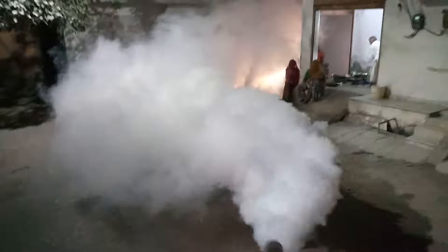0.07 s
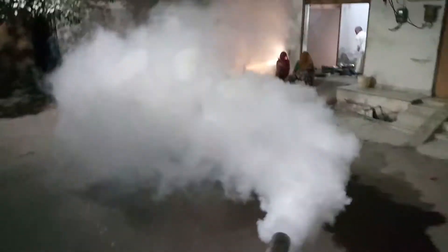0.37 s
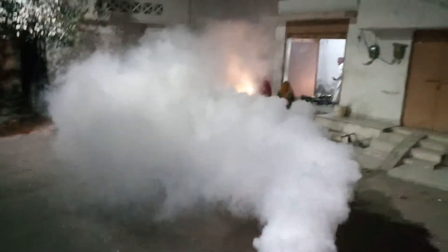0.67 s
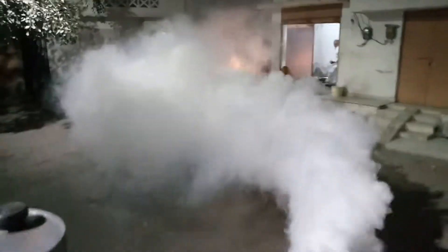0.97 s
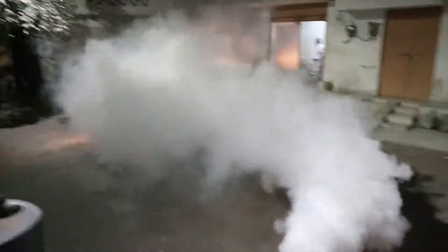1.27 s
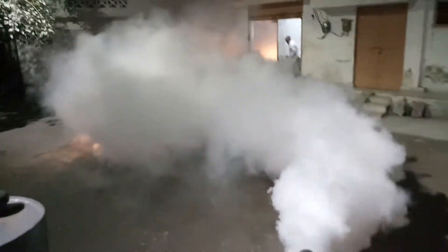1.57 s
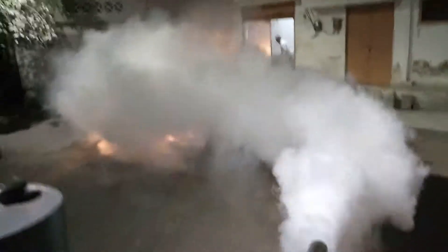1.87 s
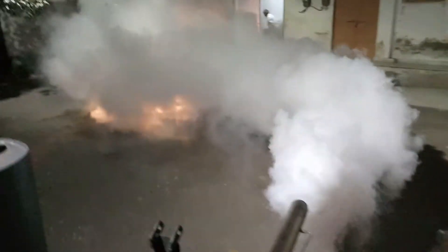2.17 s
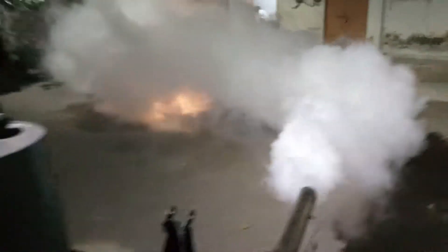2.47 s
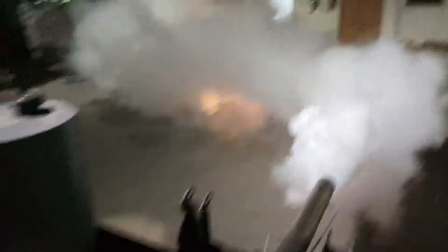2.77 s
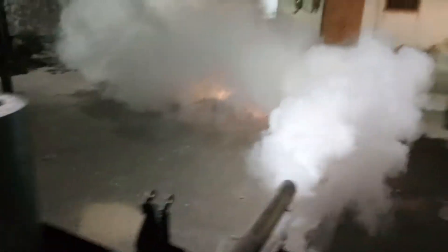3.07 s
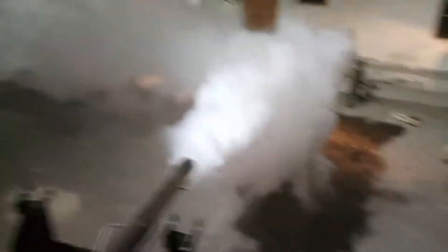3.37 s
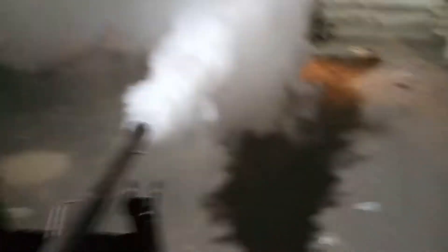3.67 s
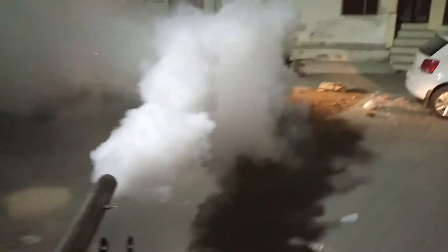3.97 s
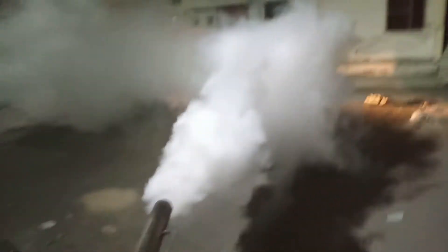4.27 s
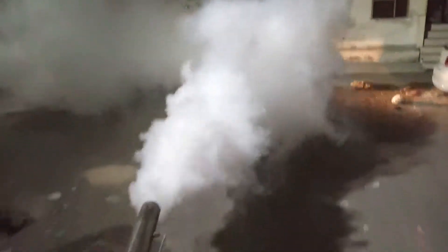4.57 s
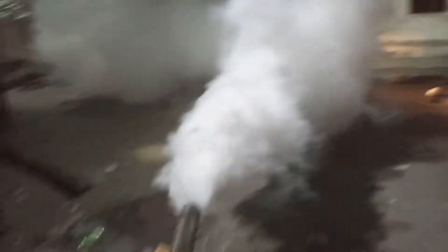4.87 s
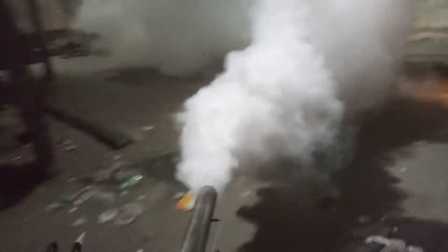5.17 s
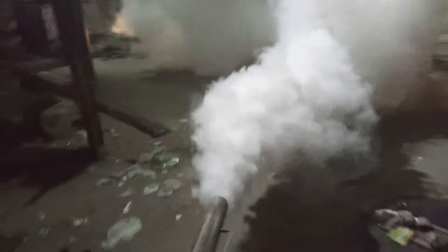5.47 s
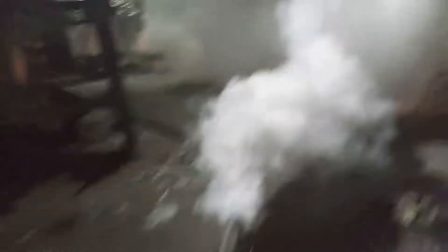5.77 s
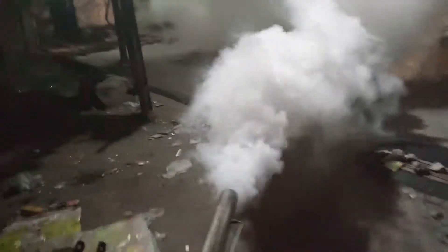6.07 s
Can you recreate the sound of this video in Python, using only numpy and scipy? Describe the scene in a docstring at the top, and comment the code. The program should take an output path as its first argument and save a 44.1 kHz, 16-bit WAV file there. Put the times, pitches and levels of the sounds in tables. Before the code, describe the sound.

At about 0.1 seconds a fogging machine cuts in abruptly, already running, loud and close, heard from just behind its barrel. Its pulse-jet engine fires very rapidly, making a low, steady drone with a harsh, buzzing rasp and a hiss of spray on top. The jet roars softly underneath, and the house fronts of the narrow street return a faint, dull wash. The pitch barely wavers and the level stays even. From about 1 second, as the barrel swings, the rasp turns a little less sizzling and more barking. Around 3.5 to 4 seconds it brightens again and gains some bite. At about 5.4 seconds the beat stumbles once, very briefly, with a small dull bump. The engine then carries on as before until the end, a little after 6 seconds.

```python
"""A narrow street, just behind the barrel of a hand-carried pulse-jet fogging machine blowing smoke.
The tube fires about 89 times a second: its air column drones, and every firing sends a sharp shock
out of the nozzle that scatters off the machine and the ground. This rasp changes colour as the barrel
swings. The jet roars underneath, house fronts return a faint wash, and the beat stumbles once."""
import sys
import numpy as np
from scipy import signal
from scipy.fft import rfft, irfft
from scipy.io import wavfile
from scipy.ndimage import uniform_filter1d, map_coordinates

SR = 44100
rng = np.random.default_rng(int(sys.argv[2]) if len(sys.argv) > 2 else 0)


def store_pcm(level_fs):
    """Save levels as 16-bit WAV."""
    pcm = np.round(np.clip(level_fs, -1, 1) * 32767).astype(np.int16)
    wavfile.write(sys.argv[1], SR, np.atleast_2d(pcm).T)


N = 274302
TIME = np.arange(N) / SR
START_S, STUMBLE_S = .1058, 5.423   # the sound cuts in; the beat stumbles


def from_db(db):
    """Decibels to gain."""
    return 10 ** (np.asarray(db) / 20)


def unit_rms(x):
    """Scale to unit power."""
    return x / np.sqrt(np.mean(x ** 2) + 1e-20)


def steady(x, size=3500):
    """Ride the gain to hold unit power, smoothed over about a dozen firings."""
    power = uniform_filter1d(uniform_filter1d(x ** 2, size), size)
    return x / np.sqrt(np.maximum(power, 1e-12))


def curves(rows):
    """Draw each column of a timed table as a curve over every sample."""
    seconds, *columns = np.transpose(rows)
    return [np.interp(TIME, seconds, column) for column in columns]


def drift(rate_hz, hop=40, settle=2000):
    """A smooth random wander with spread 1, mostly slower than rate_hz."""
    pole = np.exp(-2 * np.pi * rate_hz * hop / SR)
    noise = rng.standard_normal(N // hop + settle + 2)
    slow = signal.lfilter([1], [1, -2 * pole, pole ** 2], noise)[settle:]
    return np.interp(np.arange(N) / hop, np.arange(len(slow)), unit_rms(slow))


def butter(x, hz, kind, order=2):
    """Butterworth filter."""
    return signal.sosfilt(signal.butter(order, hz, kind, fs=SR, output="sos"), x)


def equalise(x, points, size=4096):
    """Minimum-phase EQ through (Hz, dB) points: nothing rings ahead of an attack."""
    hz, db = np.transpose(points)
    grid_hz = np.maximum(np.fft.rfftfreq(size, 1 / SR), 1)
    gain = from_db(np.interp(np.log(grid_hz), np.log(hz), db))
    cepstrum = irfft(np.log(gain))
    cepstrum[1:size // 2] *= 2
    cepstrum[size // 2 + 1:] = 0
    return signal.fftconvolve(x, irfft(np.exp(rfft(cepstrum))))[:N]


def resonance(x, hz, width_hz):
    """A two-pole resonance of gain 1."""
    r = np.exp(-np.pi * width_hz / SR)
    poles = [1, -2 * r * np.cos(2 * np.pi * hz / SR), r * r]
    return signal.lfilter([1, 0, -1], poles, x) * (1 - r * r) / 2


def street_wash(x, t60_s):
    """House fronts return a dull wash, starting 20 ms late."""
    t = np.arange(SR // 2) / SR
    tail = rng.standard_normal(len(t)) * from_db(-60 * t / t60_s) * (t > .02)
    tail /= np.sqrt(np.sum(tail ** 2))
    return butter(signal.fftconvolve(x, tail)[:N], 3500, "low")


# The tube's murmur. Each row: pitch in Hz, width in Hz, level in dB.
MURMUR_MODES = [(164.3, 28, -33.5), (345, 18.4, -33.5), (528.2, 24, -34), (684, 38, -37.5),
                (1047, 13.5, -46)]
# The tone of the jet's rumble. Each row: frequency in Hz, relative level in dB.
RUMBLE_EQ = [(25, -17), (55, -14), (100, 6.5), (170, -13.5), (260, 4.5), (400, 1.5), (600, 0.5),
             (900, -3.5), (1600, -10), (4000, -22)]


def jet_roar(rumble_db):
    """The jet's turbulence makes a broad rumble and stirs the tube's own modes."""
    noise = rng.standard_normal(N)
    murmur = sum(from_db(db) * unit_rms(butter(noise, [hz - width / 2, hz + width / 2], "band"))
                 for hz, width, db in MURMUR_MODES)
    rumble = unit_rms(equalise(rng.standard_normal(N), RUMBLE_EQ))
    return murmur + from_db(rumble_db) * rumble


def stumble_bump(peak_db):
    """The stumble comes with one dull push of pressure."""
    return from_db(peak_db) * np.exp(-((TIME - STUMBLE_S) / .0017) ** 2)


# The barrel swings out, then partway back. Each row: time in seconds, swing from 0 to 1.
BARREL_SWING = [(0.1, 0.05), (0.85, 0.04), (1.1, 0.16), (1.55, 0.42), (2.25, .38), (2.45, 0.51),
                (3.2, 0.57), (3.55, 0.89), (4.05, 1), (4.5, 0.91), (5.0, .75), (6.2, 0.82)]


def facing(angle, reach):
    """1 when the barrel's swing is at the given angle, falling to 0 as it turns away."""
    swing, = curves(BARREL_SWING)
    return np.exp(-((swing - angle) / reach) ** 2)


# The engine's beat. Each row: time in seconds, firing rate in Hz.
FIRING_RATE = [(0.12, 89.3), (0.32, 88.54), (0.41, 89.47), (0.93, 89.69), (1.07, 88.7), (1.52, 89.1),
               (1.68, 90.4), (1.93, 89.5), (2.76, 89.84), (3.05, 88.74), (3.2, 89.36), (4.91, 89.35),
               (5.03, 90.7), (5.08, 88.83), (5.76, 88.8), (5.86, 90.1), (6.05, 88.9), (6.2, 90.4)]


def firing_cycles(jitter_cycles, stumble_cycles):
    """Running count of firings; each is a little early or late, and the tube pulls the beat back."""
    rate_hz, = curves(FIRING_RATE)
    cycles = np.cumsum(rate_hz) / SR
    slips = signal.lfilter([1, .25], [1, -.88], rng.normal(0, jitter_cycles, 700))
    cycles += np.interp(cycles, np.arange(len(slips)), slips)
    cycles += stumble_cycles * np.clip((TIME - STUMBLE_S) / .0031 + .5, 0, 1)
    return cycles - cycles[int(START_S * SR)] % 1 + .5   # open midway between two firings


# The drone's low end, at the firing rate. Each row: time in seconds, level in dB.
FUNDAMENTAL_LEVEL = [(0.12, -22.5), (1.0, -19.5), (1.05, -22), (2.22, -25.5), (3.27, -20), (6.13, -20.5),
                     (6.2, -20)]
# The drone's edge, from the steepness of the wave. Each row: time in seconds, overtone drive in dB.
WAVE_STEEPNESS = [(0.12, -15), (0.24, -19), (0.9, -17), (1.59, -18), (1.64, -15), (2.2, -16), (3.3, -16),
                  (3.37, -17), (3.89, -17), (3.95, -20), (4.68, -16), (5.35, -17), (5.4, -24),
                  (5.44, -16.5), (5.79, -18.5), (5.83, -13), (6.03, -20), (6.2, -14.5)]
# The weaker overtones. Each row: multiple of the firing rate, relative level in dB.
WEAK_PARTIALS = [(3, -20), (5, -17.5), (6, -13.5), (7, -18), (8, -30.5), (9, -25), (10, -42.5), (11, -30),
                 (14, -38)]


def tube_drone(cycles, flutter, overtone_flutter):
    """The air column flutters with the uneven burn; a steeper wave trades octave for overtones."""
    fundamental_db, = curves(FUNDAMENTAL_LEVEL)
    steep_db, = curves(WAVE_STEEPNESS)
    swing, = curves(BARREL_SWING)
    phase = 2 * np.pi * cycles
    fundamental = np.cos(phase + np.pi / 3) * (1 + flutter * drift(28))
    octave = np.cos(2 * phase) * (1 + flutter * drift(5.8))
    double_octave = np.cos(4 * phase) * (1 + overtone_flutter * drift(8.8))
    honk_db = 4 * facing(.56, reach=.15)   # the sixth partial stands out at one angle
    overtones = 0
    for k, db in WEAK_PARTIALS:
        lag = (k > 4) * (k * 2 * np.pi / 7 + np.pi)   # the higher ones dip together as the shock leaves
        wobble = 1 + overtone_flutter * (drift(36) + 1j * drift(33))
        partial = np.real(wobble * np.exp(1j * (k * phase - lag)))
        overtones += from_db(db + honk_db * (k == 6)) * partial
    octave_db = -11 - .2 * (steep_db - steep_db.mean())
    return (from_db(fundamental_db) * unit_rms(fundamental)
            + from_db(octave_db) * unit_rms(octave)
            + from_db(steep_db - .5 - 3 * swing) * unit_rms(double_octave)
            + from_db(steep_db - 4) * unit_rms(overtones))


# The smear of reflections behind a shock. Each row: delay in seconds, relative level in dB.
SCATTER_DECAY = [(0, 5.5), (.0009, -1), (.0015, -6), (.0026, -0.5), (.0042, -4.5), (.007, -10.5),
                 (.011, -19), (.02, -30.5), (.04, -39)]


def scatter(x, patterns=14, size=4096):
    """Dense reflections melt from one pattern into the next as the machine is carried along."""
    delay_s, db = np.transpose(SCATTER_DECAY)
    decay = from_db(np.interp(np.arange(size) / SR, delay_s, db, right=-120))
    place = TIME / TIME[-1] * (patterns - 1)
    scattered = np.zeros(N)
    for k in range(patterns):
        spectrum = rfft(rng.standard_normal(size) * decay)
        spectrum /= np.sqrt(uniform_filter1d(np.abs(spectrum) ** 2, size=11))   # even out the colour
        crossfade = np.cos(np.pi / 2 * np.clip(place - k, -1, 1))
        scattered += signal.oaconvolve(x * crossfade, irfft(spectrum))[:N]
    return scattered


def ground_echo(x, level_db):
    """The path off the ground stretches and shrinks with the carrier's walk, sweeping a comb filter."""
    lag_s = .0024 + .00018 * drift(.3)
    return x + from_db(level_db) * map_coordinates(x, [(TIME - lag_s) * SR], order=5)


# The rings between barrel, tank and ground. Each row: pitch in Hz, width in Hz, full boost in dB,
# best angle on the 0 to 1 swing, reach either side on the same scale.
BARREL_RINGS = [(2180, 110, 11, 0.72, 0.13), (2276, 330, 8.5, .25, 0.25), (2496, 144, 9.5, 0.94, 0.11),
                (2630, 200, 10, 0.14, 0.13), (2726, 110, 5, .55, 0.089), (3000, 130, 10.5, .35, .08),
                (4190, 219, 8.5, 0.4, 0.29), (4320, 280, 7, 0.06, 0.034), (4680, 330, 10.5, 0.95, 0.12),
                (5400, 260, 7, 0.38, 0.071), (6976, 460, 5, 0.92, 0.1), (8170, 680, 7, 0, 0.074),
                (8100, 150, 2, 0.8, 0.038), (8340, 140, 8, 0.58, 0.067)]


def barrel_ringing(x):
    """Each resonance swells as the barrel nears its angle and fades as it swings on."""
    return x + sum((from_db(boost_db) - 1) * facing(angle, reach) * resonance(x, hz, width_hz)
                   for hz, width_hz, boost_db, angle, reach in BARREL_RINGS)


# The hiss of the spray behind each shock. Each row: frequency in Hz, relative level in dB.
SPRAY_EQ = [(800, -6.5), (2500, -4.5), (5000, -2), (8000, 0.5), (12000, 3)]


def shocks(cycles, delay_cycles, spread_db, spray_db, decay_cycles, spray_floor):
    """A steep front just after each pressure peak, trailed by a dying puff of turbulent spray."""
    due_cycles = np.arange(1, int(cycles[-1]) + 1) + delay_cycles
    onsets = np.round(np.interp(due_cycles, cycles, np.arange(N))).astype(int)
    clicks = np.zeros(N)
    clicks[onsets] = from_db(rng.normal(0, spread_db, len(onsets)))
    age_cycles = (cycles - delay_cycles) % 1
    outflow = np.exp(-age_cycles / decay_cycles) + spray_floor
    spray = unit_rms(outflow * equalise(rng.standard_normal(N), SPRAY_EQ))
    return unit_rms(scatter(clicks)) + from_db(spray_db) * spray


# The tone of a shock before it is split into bands. Each row: frequency in Hz, gain in dB.
SHOCK_EQ = [(450, -31.5), (700, -5.5), (1000, 2.5), (1350, -3.5), (1750, 0.5), (2300, 1.5), (2900, 2.5),
            (3500, 4.5), (5200, -1), (6100, -11.5), (8000, -8.5), (9500, -29.5), (11000, -1.5), (15700, 6)]
# Fader moves as the barrel swings. Each row: time in seconds, then bark, bite and sizzle in dB,
# each ahead of its band's trim.
RASP_FADERS = [(0.12, -27.5, -23.5, -29), (0.9, -27.5, -23.5, -28), (1.22, -25, -23, -31.5),
               (3.12, -26, -22.5, -33.5), (3.2, -24.5, -23, -33), (3.75, -26.5, -21, -29.5),
               (5.75, -27.5, -23, -29), (6.1, -27.5, -22.5, -30.5)]


def nozzle_rasp(fronts):
    """The shocks run into a rasp; the nozzle beams its treble, so the balance shifts with its aim."""
    bark_db, bite_db, sizzle_db = curves(RASP_FADERS)
    rasp = barrel_ringing(equalise(fronts, SHOCK_EQ))
    bark = from_db(bark_db - .5) * steady(butter(rasp, 1750, "low", order=5))
    bite = from_db(bite_db - 2.5) * steady(butter(rasp, [1900, 5700], "band", order=4))
    sizzle = from_db(sizzle_db + 1.46) * steady(butter(rasp, [5700, 9500], "band", order=4))
    air = from_db(-33) * steady(butter(rasp, 9700, "high", order=5))
    return bark + bite + sizzle + air


def scene():
    """Rasp and drone share one beat, over the jet's roar and the street's faint wash, in mono."""
    cycles = firing_cycles(jitter_cycles=.0085, stumble_cycles=.04)
    fronts = shocks(cycles, delay_cycles=.125, spread_db=.3,
                    spray_db=-4.5, decay_cycles=.2, spray_floor=.11)
    rasp = nozzle_rasp(ground_echo(fronts, level_db=-13.5))
    drone = tube_drone(cycles, flutter=.04, overtone_flutter=.064)
    roar = jet_roar(rumble_db=-28.5)
    wash = from_db(-31) * street_wash(rasp, t60_s=.33)
    return (wash + roar + stumble_bump(peak_db=-14) + drone + rasp)[None]


def record(dry):
    """The sound cuts in abruptly; peaks clip at full scale and the top is cut above 15.9 kHz."""
    clipped = np.clip(dry * (TIME >= START_S), -1, 1)
    return signal.sosfilt(signal.ellip(12, .1, 90, 15900, fs=SR, output="sos"), clipped)


dry = scene()
out = record(dry)
store_pcm(out)
```